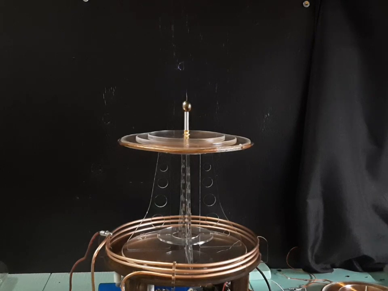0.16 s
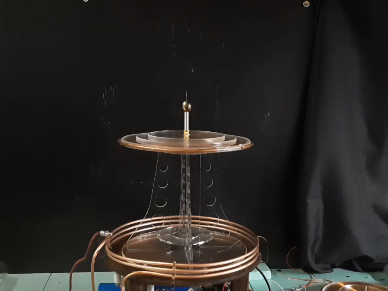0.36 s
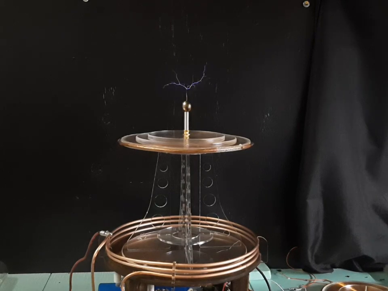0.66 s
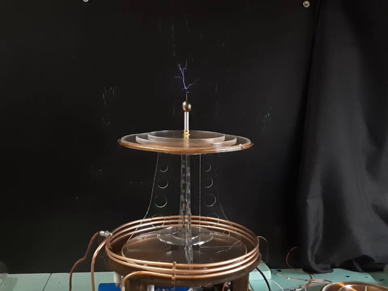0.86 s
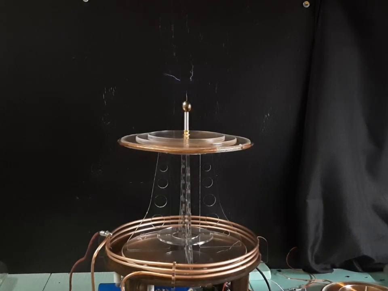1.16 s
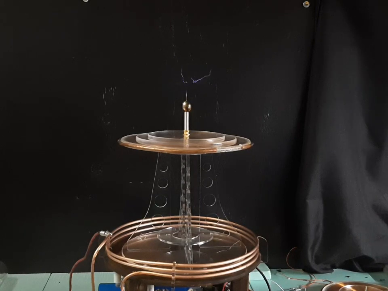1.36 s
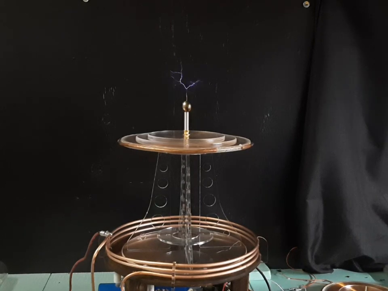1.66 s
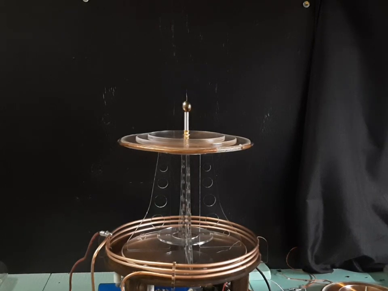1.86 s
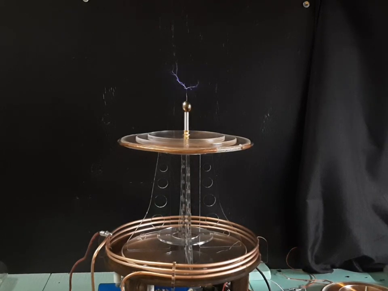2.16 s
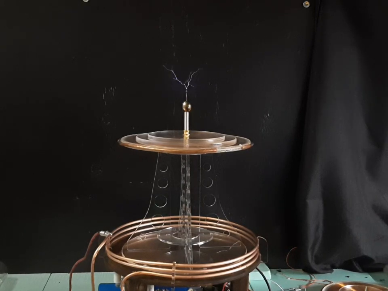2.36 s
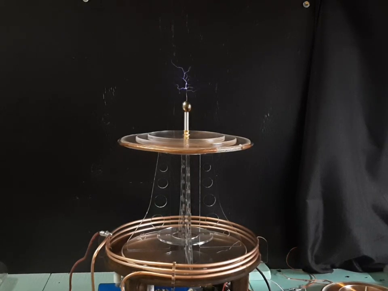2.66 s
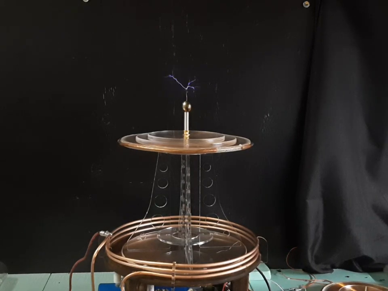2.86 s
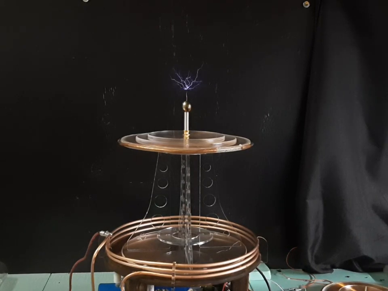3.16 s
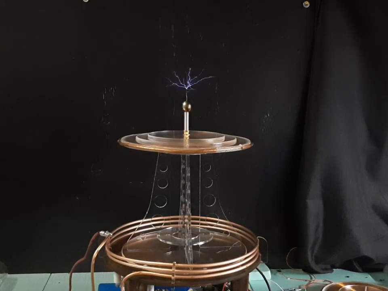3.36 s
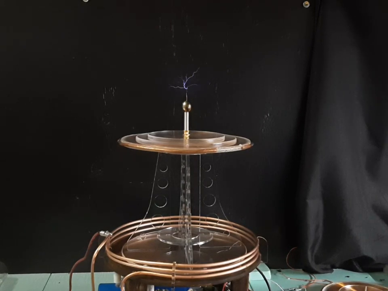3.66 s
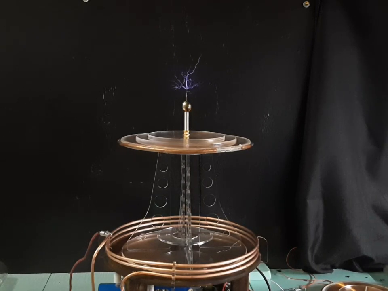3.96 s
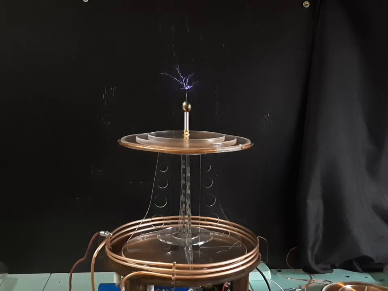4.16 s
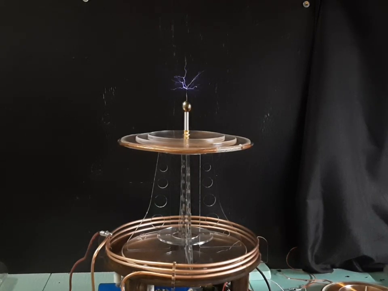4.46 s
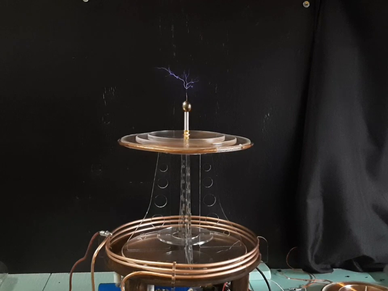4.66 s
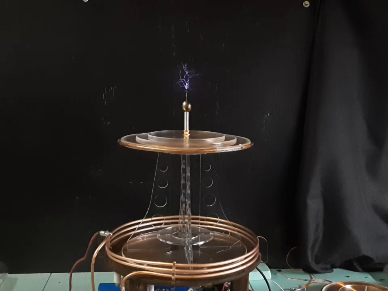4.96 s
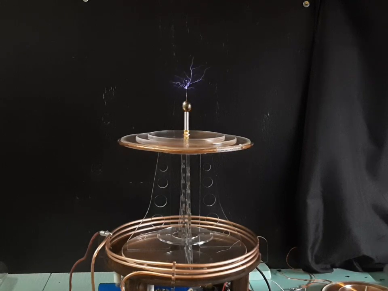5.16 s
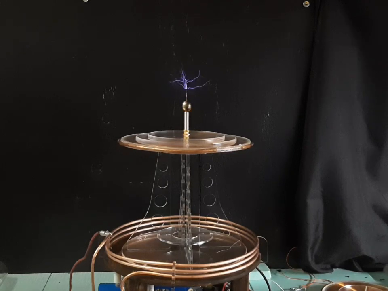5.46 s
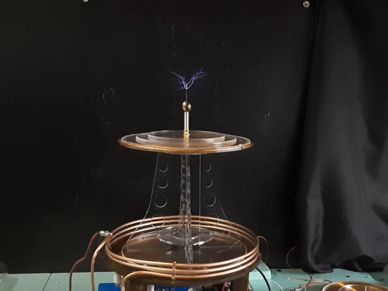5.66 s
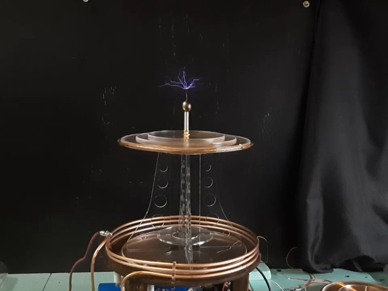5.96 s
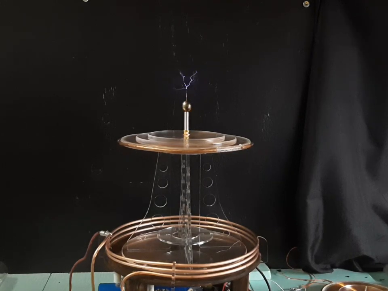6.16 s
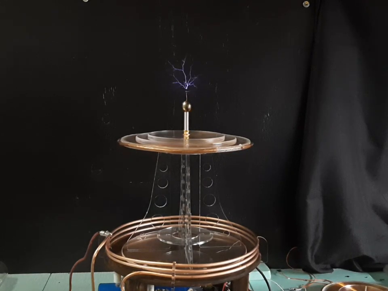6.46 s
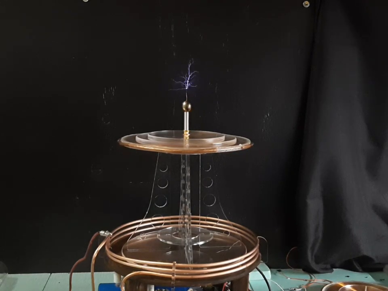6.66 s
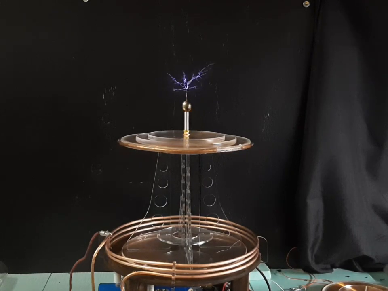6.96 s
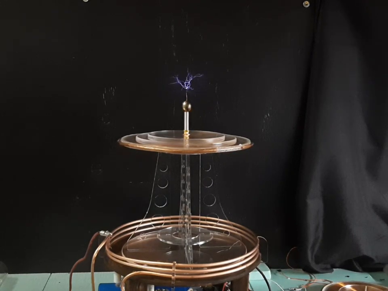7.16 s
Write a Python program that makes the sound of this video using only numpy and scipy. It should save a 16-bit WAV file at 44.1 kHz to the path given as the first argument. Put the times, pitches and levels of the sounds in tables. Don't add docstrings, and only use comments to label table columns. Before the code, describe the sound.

A rattle of sharp, bright electric spark cracks quickens in steps into a coarse buzz, ringing in a hard-walled room with occasional low thumps.

```python
import sys
import numpy as np
from scipy import signal
from scipy.fft import rfft, irfft, next_fast_len
from scipy.io import wavfile

SR = 44100
rng = np.random.default_rng(int(sys.argv[2]) if len(sys.argv) > 2 else 0)


def level_to_linear(level):
    exponent = np.asarray(level, float) / 20
    return 10 ** exponent


def int16_out(signal):
    q = np.round(np.clip(np.atleast_2d(signal).T, -1, 1) * 32767)
    wavfile.write(sys.argv[1], SR, q.astype(np.int16))


N = 321926
SIZE = next_fast_len(N)
HZ = np.fft.rfftfreq(SIZE, 1 / SR)
SOUND_M_S = 343

# f/Hz, level/dB
RUMBLE_SPECTRUM = [(30, -17), (50, 2), (100, -21), (200, 10), (400, 12), (2000, -18)]
# rate reached/(sparks/s), sparks while turning, slowing of the hand, sparks held
DIAL_TURNS = [(25, 0, 1, 40), (31, 8, 1.1, 11), (35, 7, 2, 17), (40, 9, 1.4, 6), (41, 0, 1, 16),
              (45, 9, 1.2, 6), (46, 0, 1, 22), (48, 2, 1, 4), (47, 0, 1, 2), (51, 14, 1.4, 22),
              (55, 10, 1.5, 3), (58, 15, 1.4, 40), (68, 0, 1, 19), (78, 0, 1, 26)]
# t/s, left level/dB, right level/dB
AMPLIFIER_KICKS = [(.026, -60, -36), (.146, -21, -18), (.266, -41, -31), (.706, -64, -21.5), (1.306, -29, -26),
                   (1.666, -20, -22.5), (1.742, -28, -36), (2.457, -29, -47), (2.63, -40, -34),
                   (3.002, -30.5, -28.5), (3.084, -31, -35), (3.536, -21.5, -32), (3.804, -46, -34),
                   (3.989, -34, -43), (4.296, -28, -32), (4.47, -33, -27), (4.685, -21, -12),
                   (5.014, -35, -29), (5.23, -23, -28), (5.505, -38, -24.5), (5.905, -42, -27.5),
                   (6.096, -49, -20), (6.182, -37, -35), (6.355, -20, -26), (6.372, -24, -19.5),
                   (6.8, -33, -39), (6.975, -19, -41), (7.026, -41, -15), (7.039, -23, -20),
                   (7.155, -51, -16.5),
                   (.066, -51, -44), (.186, -50, -38), (.226, -45, -41), (.986, -52, -42), (2.113, -39, -42),
               (2.209, -47, -61), (2.306, -36, -51), (2.687, -36, -60), (2.945, -40, -50),
               (3.414, -42, -51), (3.585, -37, -49), (3.874, -44, -46), (4.34, -53, -38), (4.448, -55, -33),
               (4.535, -40, -36), (5.691, -35, -43), (5.763, -46, -39), (5.852, -52, -43), (6.01, -47, -40),
               (6.148, -43, -37), (6.424, -52, -33), (6.476, -49, -35), (6.648, -41, -44),
               (6.742, -43, -39), (6.845, -49, -32), (6.903, -51, -39), (7.18, -44, -36)]
# t/s, level/dB
USUAL_STRENGTH = [(0, .5), (.3, -1), (.65, -.5), (1.3, 1), (2, 0), (2.5, 0), (3, -0.5), (3.7, -.5),
                  (4.5, -1.5), (5.2, 0), (5.7, -1), (6.1, -1.5), (6.45, -1.5), (6.65, 0), (6.9, -2.5),
                  (7.3, -2)]
# t/s, crack
# level/dB, echo level/dB
UNUSUAL_STREAMERS = [(0.386, 8, 6), (0.466, 5, 3.5), (0.906, 11, 3), (1.026, 8, 1.5), (1.626, 25, 2),
                     (2.659, 3, 3), (2.744, 3, 0.5), (3.162, 11, 2.5), (3.289, 4, 1.5), (3.438, 2, 3),
                     (3.755, 7, 4), (4.078, 11, 3), (4.253, 1.4, 3.7), (4.557, 9, 3), (4.622, 2, 4.1),
                     (4.706, 6, 2.5), (4.934, 3, 2.5), (4.974, 7, 0.5), (5.348, 8, -1.5), (5.387, 16, -1),
                     (5.407, 2, 3), (5.636, 10, 3.5), (5.655, 11, 2), (5.673, 2.2, 1), (5.799, 6, 3.5),
                     (6.251, 10, 2.5), (6.286, 6, 4.2), (6.338, 1.2, 0), (6.648, 5, 1), (7.116, 10, -2),
                     (1.506, -7, -2.5), (1.586, -4, -1.5), (2.516, -11, -6), (2.687, -2, -6),
                     (3.002, -3, -0.5), (3.136, -2.0, -4), (3.188, -11, -2), (3.239, 3, -4),
                     (3.264, -2.9, -1.5), (3.463, -4.4, -7), (3.989, -7, -11), (4.1, -1.6, -3),
                     (4.209, -6, -5), (4.405, -1, -2), (4.427, -3.2, -2.5), (4.769, 2, -2),
                     (4.811, 1, -3.7), (5.014, -11, -7), (5.191, -3, -8), (5.524, -5.0, -4), (6.01, 1, -2),
                     (6.062, -3, -3.1), (6.096, 0.3, -4.2), (6.114, -1, -2.9), (6.407, 3, -8),
                     (6.424, -1, -3), (6.493, -8, -3.1), (6.874, -14, -14), (6.933, 3, -5),
                     (7.27, -3.0, -4)]
# delay/ms, signed gain/1
NEAR_ECHOES = [
    [(2.38, 0.48), (3.17, -0.86), (3.51, 1), (3.81, -1.01), (5.4, -0.44), (6.39, 0.58), (6.87, -0.9), (7.66, -0.067), (12.34, -0.53), (24.26, 0.38)],
    [(2.38, 1.28), (3.2, -0.31), (3.47, 0.73), (3.79, -0.54), (5.56, 0.33), (6.78, 0.87), (7.51, 0.25), (7.98, 0.27), (11.88, 0.3), (19.91, 0.22)],
]
# level/dB, t60/s
TAIL_BANDS = [(-24, 0.19), (-13, 0.58), (-14.5, 0.22)]
TAIL_SPLITS = (2070, 7700)
# f/Hz, level/dB (per Hz)
SPARK_COLOUR = [(90, -31), (250, -26), (500, -13), (800, -10), (1100, -12), (1700, -4.5), (3000, -5),
                (5000, -5), (7600, -5), (8700, -14), (10200, -10.5), (12000, -5.5), (14500, -8.5),
                (16200, -6.5)]
# f/Hz, level/dB
SIDE_BALANCE = [(60, 18), (180, 2), (550, -2), (1650, -5.5), (4970, -2.5), (15000, -6)]
# f/Hz, width/Hz, level/dB
STANDING_WAVES = [(466, 55, 4), (544, 89, -2.5), (800, 240, 1), (917, 120, -1.5), (1120, 240, 1),
                  (1790, 185, -2.5), (2000, 147, 3.5), (2380, 170, -3.5), (2486, 98, 4.5), (2900, 68, 0.5),
                  (4320, 120, 2.5), (4710, 180, 2), (5880, 64, 5.5), (7900, 360, 3.5)]


def evened(x):
    return x / np.sqrt(np.mean(x ** 2))


def read(points, hz):
    f, value = np.transpose(points)
    return np.interp(np.log(hz + 1), np.log(f + 1), value)


def rumble(level_db=-63):
    a, b = rng.standard_normal((2, SIZE))
    spectrum = rfft([a + .5 * b, a - .5 * b]) * level_to_linear(read(RUMBLE_SPECTRUM, HZ))
    return level_to_linear(level_db) * evened(irfft(spectrum, SIZE)[:, :N])


def firings(first_s=.065744, clock=1.00006, pause_s=6.87e-6, earlier=14):
    before = DIAL_TURNS[0][0]
    rates = [before] * earlier
    for rate, turning, slowing, held in DIAL_TURNS:
        way = (np.arange(turning) + .5) / max(turning, 1)
        steps = np.floor((rate - before - 1) * way ** (1 / slowing))
        rates += list(before + 1 + steps) + [rate] * held
        before = rate
    periods_s = clock / np.r_[rates, before] + pause_s
    spark_s = np.cumsum(np.r_[0, periods_s])
    return spark_s - spark_s[earlier] + first_s


def nearest(spark_s, rows):
    return abs(spark_s[:, None] - np.array(rows)[:, 0]).argmin(0)


def kicks(spark_s, cut_hz=64.0, soft_hz=1230.0, boost_db=3.5, faint_db=-59.5, faint_spread_db=5.5):
    level_db = faint_db + faint_spread_db * rng.standard_normal((len(spark_s), 2))
    known = AMPLIFIER_KICKS
    level_db[nearest(spark_s, known)] = np.array(known)[:, 1:]
    at = np.round(spark_s * SR).astype(int)
    heard = (at >= 0) & (at < N)
    drops = np.zeros((2, N))
    drops[:, at[heard]] = -level_to_linear(level_db[heard].T + boost_db)
    rest_point = np.cumsum(drops, axis=1)
    low_cut = signal.butter(4, cut_hz, "highpass", fs=SR, output="sos")
    softening = signal.butter(1, soft_hz, fs=SR, output="sos")
    return signal.sosfilt(np.r_[low_cut, softening], rest_point)


def surfaces(count, first_ms=9, last_ms=32, wall_gain=0.24, fade_db_per_ms=-0.0542):
    place, sign = rng.random((2, 2, count))
    delay_ms = first_ms + (last_ms - first_ms) * (np.arange(count) + place) / count
    gain = wall_gain * np.sign(sign - .5) * level_to_linear(fade_db_per_ms * (delay_ms - first_ms))
    return [np.r_[near, np.c_[ms, g]] for near, ms, g in zip(NEAR_ECHOES, delay_ms, gain)]


def headings(count):
    v = rng.standard_normal((count, 3))
    return v / np.linalg.norm(v, axis=1, keepdims=True)


def streamers(count, reach_m=.02, uneven_db=1.5):
    draws = rng.standard_normal((count, 10, 4))
    forks_m = reach_m * np.linspace(.25, 1.8, num=10)[:, None] * draws[..., :3]
    share = level_to_linear(uneven_db * draws[..., 3])
    return forks_m, share / np.linalg.norm(share, axis=1, keepdims=True)


def in_step(forks_m, share):
    hz = np.linspace(0, SR / 2, num=64)
    waves = share[..., None, None] * np.exp(2j * np.pi * hz * forks_m[..., None] / SOUND_M_S)
    power = (abs(waves.sum(1)) ** 2).mean((0, 1))
    return np.interp(HZ, hz, np.sqrt(power))


def arrivals(spark_s, gain, forks_m, share, delay_s, heading, path_gains):
    at_s = spark_s[:, None, None] + delay_s + forks_m @ heading.T / SOUND_M_S
    at = np.clip(np.round(at_s * SR).astype(int) + 1, 0, N + 1).ravel()
    strength = gain[:, None, None] * share[:, :, None]
    return [rfft(np.bincount(at, (strength * g).ravel(), N + 2)[1:N + 1], SIZE) for g in path_gains]


def sparks(spark_s, level_db=-19.5, ports_m=.1, echo_db=-3.5, scattered=0.075, usual_spread_db=1.65,
           count=1500):
    forks_m, share = streamers(len(spark_s))
    crack_db, wet_db = usual_spread_db * rng.standard_normal((len(spark_s), 2)).T
    unusual = UNUSUAL_STREAMERS
    odd = nearest(spark_s, unusual)
    crack_db[odd], wet_db[odd] = np.array(unusual)[:, 1:].T
    crack_db = 4.5 * np.tanh(crack_db / 4.5)
    usual_db = np.interp(spark_s, *np.transpose(USUAL_STRENGTH))
    crack, wet = level_to_linear(usual_db + crack_db), level_to_linear(usual_db + wet_db)

    late_s = .002 + (np.arange(count) + rng.random(count)) / 5000
    late_way, sign = headings(count), rng.choice([-1., 1.], count)
    walls = surfaces(count=14)
    near_way = headings(len(walls[0]))
    above_bass, treble = (1 / (1 + (f / (HZ + 1)) ** 2) for f in TAIL_SPLITS)
    bands = 1 - above_bass, above_bass - treble, treble
    colour_db = read(SPARK_COLOUR, HZ)
    for hz, width, db in STANDING_WAVES:
        colour_db = colour_db + db / (1 + (2 * (HZ - hz) / width) ** 2)

    out = []
    for side, echoes in zip((1, -1), walls):
        delay_ms, gain = np.transpose(echoes)
        toward = np.array([[.14 * side, .8, .15]])
        z, = arrivals(spark_s, crack, forks_m, share, np.zeros(1), toward, [1])
        near, = arrivals(spark_s, wet, forks_m, share, delay_ms / 1000, near_way, [gain * level_to_linear(echo_db)])
        z += near * (1 - scattered * treble)

        delay_s = late_s + side * ports_m / 2 * late_way[:, 0] / SOUND_M_S
        onset = np.minimum(late_s / 0.0018, 1)
        facing = sign * level_to_linear(side * 1.9 * late_way[:, 0]) * onset
        dying = [facing * level_to_linear(db - 60 * late_s / t60) for db, t60 in TAIL_BANDS]
        tails = arrivals(spark_s, wet, forks_m, share, delay_s, late_way, dying)
        z += sum(band * tail for band, tail in zip(bands, tails))

        side_db = side * read(SIDE_BALANCE, HZ) / 2
        z *= 1j * level_to_linear(colour_db + side_db) / in_step(forks_m, share)
        out.append(irfft(z, SIZE)[:N])
    return level_to_linear(level_db) * evened(np.array(out))


def scene():
    spark_s = firings()
    return sparks(spark_s) + kicks(spark_s) + rumble()


def low_pass(x):
    return signal.sosfilt(signal.butter(12, 17030, fs=SR, output="sos"), x)


def record(dry):
    limited = .85 * np.tanh(dry / .85)
    edge = signal.firwin(1023, 15760, window=("kaiser", 7), fs=SR)
    finished = signal.oaconvolve(limited, edge[None], "same")
    return low_pass(finished)


dry = scene()
out = record(dry)
int16_out(out)
```